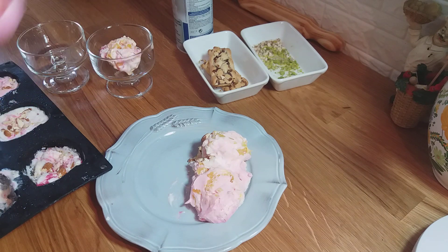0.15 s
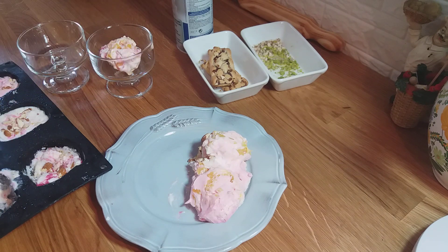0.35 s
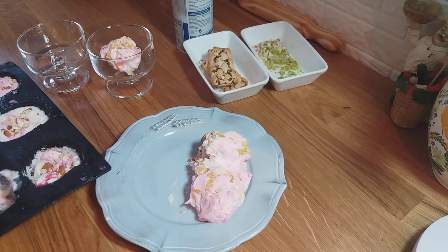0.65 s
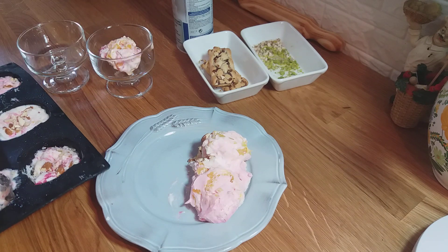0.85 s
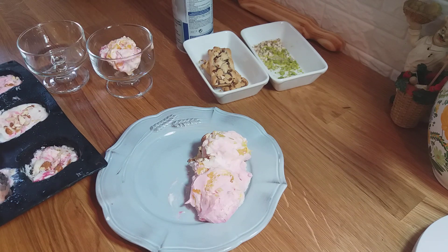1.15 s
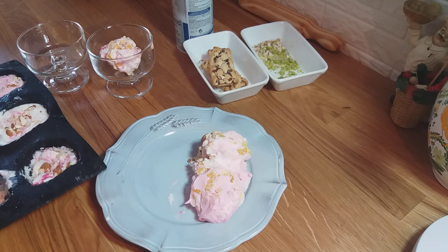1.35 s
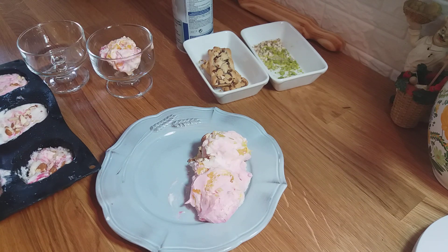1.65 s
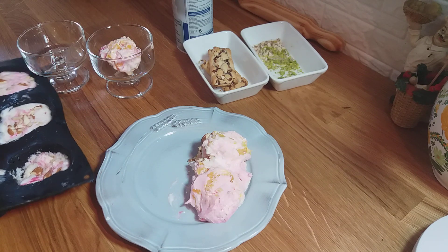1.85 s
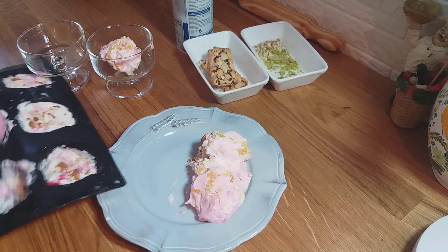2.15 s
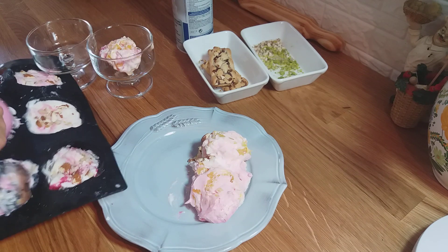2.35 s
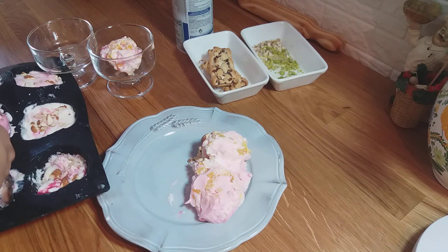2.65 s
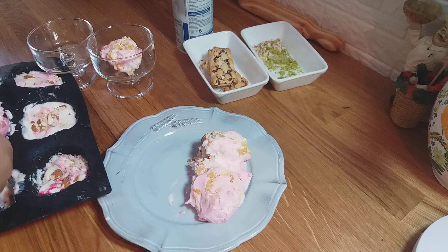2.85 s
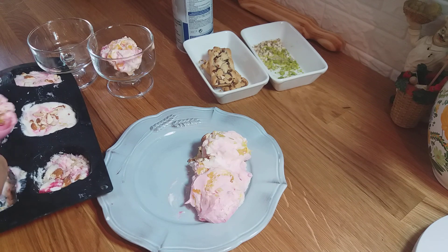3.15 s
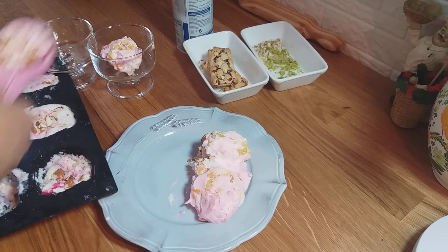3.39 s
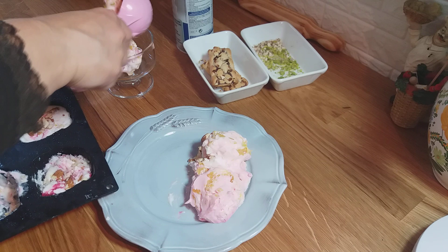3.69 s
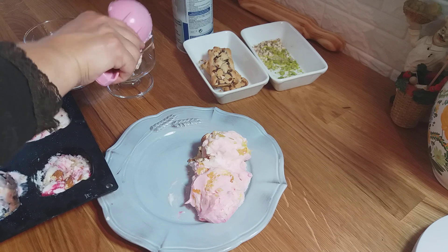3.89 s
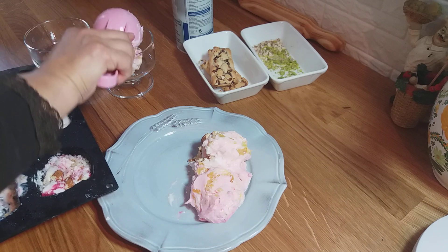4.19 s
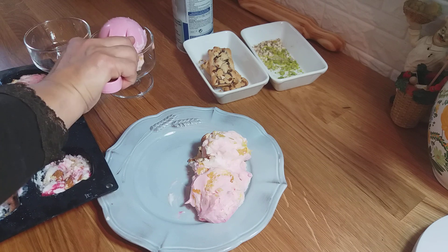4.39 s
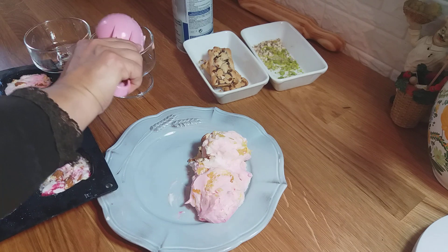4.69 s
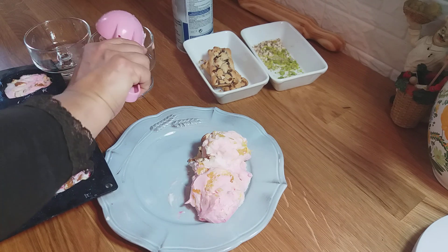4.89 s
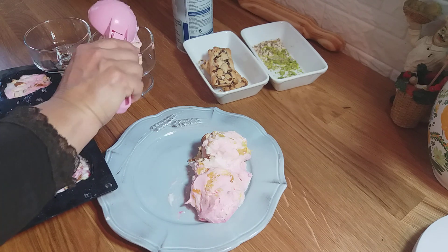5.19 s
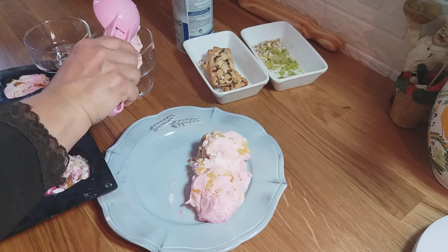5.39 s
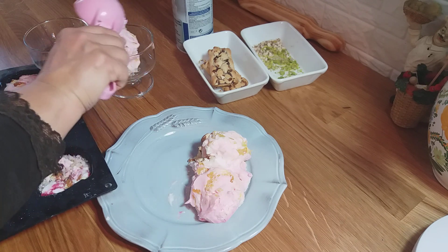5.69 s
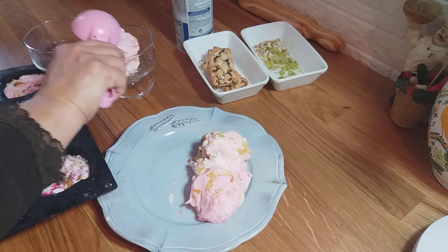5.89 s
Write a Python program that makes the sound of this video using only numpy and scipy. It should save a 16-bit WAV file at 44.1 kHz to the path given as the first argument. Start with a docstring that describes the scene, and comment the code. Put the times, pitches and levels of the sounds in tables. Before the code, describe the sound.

A faint fridge hum with a thin whine runs throughout, in a small kitchen with a short, hard echo. A scoop's steel spring ticks lightly, clearest at 0.4 seconds. From about 0.8 to 1 second its plastic shell snaps, creaks and crackles sharply. A tray gives a loud, clattering knock on the wooden counter at 1.4 seconds, then softer knocks near 1.7 and 2.2. It slides briefly and strikes glass cups at 2.4 seconds; they chatter and ring brightly for a moment over a wooden thud, the loudest sound. A dull knock follows at 2.8, then tiny plastic ticks around 3.1. After a lull, a very soft low rumble swells from 4.1 to 4.5 seconds. The scoop bumps gently into a cup at 4.6 and gives a quick cluster of sharp snaps at 4.8. A barely audible knock comes near 5.8 seconds.

```python
"""In a small, hard-walled kitchen, frozen dessert is served on a wooden counter while a fridge hums.
The steel spring of a plastic scoop ticks, and its lever sticks and slips, making the shell crackle.
A mould tray knocks on the wood and slides into glass cups, which chatter together and ring.
After a soft, low rumble, the loaded scoop bumps into a cup and snaps again."""
import sys
import numpy as np
from scipy import signal
from scipy.fft import rfft, irfft, next_fast_len
from scipy.io import wavfile
from scipy.ndimage import map_coordinates

SR = 44100
rng = np.random.default_rng(int(sys.argv[2]) if len(sys.argv) > 2 else 0)


def unload_audio(sound):
    """Save the sound as a 16-bit wav file, at the path given as the first command line argument."""
    columns = np.transpose(np.atleast_2d(sound))
    # keep every value between -1 and 1, then stretch to whole-number steps
    steps = np.round(np.clip(columns, -1, 1) * 32767)
    wavfile.write(sys.argv[1], SR, steps.astype(np.int16))


N = 266364
AGE = np.arange(SR // 2) / SR  # seconds since a blow
HZ = np.fft.rfftfreq(SR, 1 / SR)
OCTAVES = np.log2((HZ + 1) / 8000)  # octaves above 8000 Hz, for tilting the treble


def amp(db):
    """Turn decibels into a gain."""
    return 10 ** (np.asarray(db) / 20)


def unit(x):
    """Scale x to an average (rms) level of 1."""
    return x / np.sqrt(np.mean(x ** 2) + 1e-20)


def along(points, hz):
    """Read between (frequency, value) points on a pitch scale."""
    freqs, values = np.transpose(points)
    return np.interp(np.log(hz + 1), np.log(freqs), values)


def resonances(table, hz):
    """Gain of an object that favours certain pitches; small objects give off little bass."""
    power = sum(amp(db) ** 2 / (1 + ((hz - pitch) / width * 2) ** 2) ** 1.5
                * np.minimum(hz / pitch, 1) ** 2 for pitch, width, db in table)
    return np.sqrt(power)


def fade(t60):
    """Die away after a blow; t60 is the ring time, the seconds taken to fall 60 dB."""
    return amp(-60 * AGE / t60)


def wobble(rate):
    """A smooth random curve through `rate` points a second."""
    points = rng.standard_normal(int(N * rate / SR) + 4)
    return map_coordinates(points, [np.arange(N) * rate / SR])


def filtered(x, response):
    """Give each frequency in x its own gain."""
    size = next_fast_len(N + SR // 2)
    return irfft(rfft(x, size) * response(np.fft.rfftfreq(size, 1 / SR)), size)[:N]


def swell(rows):
    """A gain that follows (time [s], level [dB]) rows and dies away outside them."""
    times, db = np.transpose(rows)
    t = np.arange(N) / SR
    outside_s = np.abs(t - np.clip(t, times[0], times[-1]))
    return amp(np.interp(t, times, db) - 600 * outside_s)


def add(track, s, sound):
    """Mix a sound in, starting at s seconds."""
    part = track[round(s * SR):][:len(sound)]
    part += sound[:len(part)]


def blow(gain, t60, push_db):
    """One hit: a sharp push and a dying burst of noise, coloured by the object's gain curve."""
    force = rng.standard_normal(len(AGE)) * fade(t60)
    force[0] += amp(push_db) * np.linalg.norm(force)
    cepstrum = irfft(np.log(gain + 1e-6), SR)
    body = np.exp(rfft(2 * cepstrum[:SR // 2], SR))  # rings only after the hit, never before
    sound = irfft(rfft(force, SR) * body, SR)[:len(AGE)]
    return sound / np.linalg.norm(sound) * np.sqrt(SR / 100)  # the energy of 10 ms at level 1


def ringing(modes, scatter_db):
    """The dying tones of a struck object, each with a new strength and sign at every hit."""
    return sum(amp(db + rng.normal(0, scatter_db)) * rng.choice([-1, 1])
               * fade(t60) * np.sin(2 * np.pi * hz * AGE) for hz, db, t60 in modes)


def in_kitchen(x, wet_db):
    """Add the echo of the hard walls at level wet_db; its treble dies first."""
    # how long the room rings: (frequency [Hz], ring time [s])
    echo_times = [(100, 0.52), (500, 0.37), (1500, 0.4), (4000, 0.4), (8000, 0.34), (12000, 0.25),
                  (16000, 0.25)]
    hz, t, noise = signal.stft(rng.standard_normal(len(AGE)), SR, nperseg=256)
    decay = amp(-60 * t / along(echo_times, hz)[:, None])
    tail = signal.istft(noise * decay, SR, nperseg=256)[1][:len(AGE)]
    tail *= 1 - fade(0.022)  # echoes build up over the first milliseconds
    room = amp(wet_db) * tail / np.linalg.norm(tail)
    room[0] += 1  # the direct sound
    return signal.fftconvolve(x, room)[:len(x)]


def tones(table, waver_db, drift):
    """Lasting tones that waver a little in level and pitch."""
    t = np.arange(N) / SR
    return sum(np.sqrt(2) * amp(db + waver_db * wobble(8.7))
               * np.sin(2 * np.pi * (hz * t + rng.random()) + drift * wobble(7.5)) for hz, db in table)


def refrigerator():
    """The fridge motor hums unsteadily, with a thin whine, over soft room noise."""
    # colour of the room noise: (frequency [Hz], relative level [dB])
    air_colour = [(25, -13), (42, -9.5), (60, -0.5), (85, 0), (200, -0.5), (350, 5), (600, -4.5),
                  (900, -7.5), (1500, -12.5), (2200, -11.5), (4000, -18), (6800, -27.5), (8500, -21),
                  (11000, -23.5), (16000, -20.5)]
    # low tones of the motor: (pitch [Hz], level [dB])
    hum_tones = [(96.9, -71.5), (145.3, -71.5), (193, -65.5), (241, -64), (293.8, -62), (357.3, -68.5),
                 (393.0, -75.5), (441.4, -81), (500.6, -74.5), (576.0, -76.5), (672.9, -77.5)]
    # high tones of the whine: (pitch [Hz], relative level [dB])
    whine_tones = [(1879, -87), (2024, -83), (2159, -82), (2455, -86.5), (3515, -83), (5249, -96.5)]
    air = unit(filtered(rng.standard_normal(N), lambda hz: amp(along(air_colour, hz))))
    hum = tones(hum_tones, waver_db=1, drift=.35)
    whine = amp(1) * tones(whine_tones, waver_db=.5, drift=.5)
    return hum + whine + amp(-62 + .5 * wobble(4.98)) * air


def spring():
    """The scoop's steel spring ticks lightly as the grip shifts."""
    # ticks: (time [s], level [dB], treble tilt [dB per octave])
    ticks = [(0.1444, -59, -4.5), (.252, -63, -5), (.3915, -40.5, 0.5)]
    # resonances of the spring: (pitch [Hz], width [Hz], level [dB])
    steel_peaks = [(2120, 660, -10), (3480, 800, -1.5), (5000, 700, -5.5), (8960, 790, 3), (10100, 900, -5),
                   (11900, 900, -6), (13500, 900, -9), (15200, 1200, -12)]
    out, steel = np.zeros(N), resonances(steel_peaks, HZ)
    for s, db, tilt_db in ticks:
        tick = blow(steel * amp(tilt_db * OCTAVES), t60=0.019, push_db=-2)
        add(out, s, amp(db) * in_kitchen(tick, wet_db=-7.5))
    return out


def scoop():
    """Each slip of the lever snaps the plastic shell; lighter snaps are shorter and thinner."""
    # single snaps: (time [s], level [dB], place [0 lever to 1 bowl])
    snaps = [(0.7705, -34, .45), (.792, -44, .15), (0.8205, -30, .35), (0.8412, -31, .2),
             (0.865, -32.5, .15), (0.9332, -26, 0), (.938, -34.5, 0), (0.9663, -28, 0), (0.9766, -26.5, .2),
             (2.1155, -50.5, .35), (2.4015, -54.5, .5), (3.0585, -58, .3), (3.087, -60.5, .5),
             (4.812, -38, 1), (4.8202, -29.5, .9), (4.8366, -28.5, .4)]
    # shell resonances: (pitch [Hz], width [Hz], level hit at the lever [dB], level hit at the bowl [dB])
    shell_peaks = [(1040, 288, -14.5, -12.5), (1867, 480, -7, -4), (2260, 350, -5, -6.5),
                   (3550, 490, -3, -8.5), (4300, 500, -10.5, -0.5), (4960, 540, -2.5, -4.5),
                   (6006, 580, 1, -6), (8330, 600, 2.5, 3.5), (9110, 880, -2.5, 3.5),
                   (10130, 1000, 0.5, -9.5), (11850, 1200, -8.5, 2.5), (13600, 2300, -5.5, -4),
                   (15300, 2100, -6, -4)]
    firm_db, firm_ring_s = -30.5, 0.03  # a firm snap
    out, peaks = np.zeros(N), np.array(shell_peaks)
    lever, bowl = resonances(peaks[:, :3], HZ), resonances(peaks[:, [0, 1, 3]], HZ)
    crack = amp(-14) * HZ / (HZ + 1200)  # broad, with no pitch
    for s, db, place in snaps + slips():
        t60 = firm_ring_s * 2 ** ((db - firm_db) / 20)  # 20 dB stronger rings twice as long
        tilt_db = 0.056 * (firm_db - db)
        shell = np.hypot(lever ** (1 - place) * bowl ** place, crack)
        snap = blow(shell * amp(tilt_db * OCTAVES), t60, push_db=-9.5)
        add(out, s, amp(db) * in_kitchen(snap, wet_db=-5.5))
    return out


def slips():
    """List the snaps that make up the creaks: the lever sticks and lets go at a nearly even rate."""
    # creaks: (start [s], length [s], rate [slips per s], level [dB], place [0 lever to 1 bowl])
    creaks = [(0.8758, .0315, 175, -33, .05), (1.53, .08, 32, -61.5, .8), (2.128, .03, 88, -56, .4)]
    scatter_s, scatter_db = 0.00033, 1
    return [(start + age + rng.normal(0, scatter_s), db + rng.normal(0, scatter_db), place)
            for start, length, rate, db, place in creaks for age in np.arange(0, length, 1 / rate)]


def tray():
    """The tray rocks and knocks on the counter; some knocks are sharp, others dull."""
    # knocks: (time [s], level [dB], treble fades above [Hz], thump compared with the knock [dB])
    knocks = [(1.122, -55.5, 4000, -23), (1.3555, -30.5, 12300, -24), (1.3674, -26, 7000, -23.5),
              (1.3767, -33, 3000, -16), (1.648, -55, 12100, 5.5), (1.673, -45, 3900, -36),
              (2.2015, -39, 2497, -6.5), (2.766, -46, 4040, -8.5), (5.818, -64.5, 2500, -17)]
    # colour of the tray: (frequency [Hz], relative level [dB])
    tray_colour = [(100, -25), (400, -24.5), (680, -14.5), (900, 4), (1150, 1), (1650, 2.5), (2100, -9.5),
                   (3800, -12), (6000, -18.5), (9000, -13.5), (12000, -16), (16000, -29)]
    out, body = np.zeros(N), amp(along(tray_colour, HZ))
    for s, db, treble_hz, thump_db in knocks:
        knock = blow(body / np.hypot(1, HZ / treble_hz), t60=0.041, push_db=0)
        thump = blow(counter(), t60=.025, push_db=3)
        add(out, s, amp(db) * in_kitchen(knock + amp(thump_db) * thump, wet_db=-6))
    return out


def counter():
    """Gain curve of the wooden counter, which answers a hit with a dull thud."""
    # colour of the wood: (frequency [Hz], relative level [dB])
    wood_colour = [(25, -46), (45, -33.5), (80, -22.5), (130, -7), (215, -3.5), (330, -5.5), (430, -5),
                   (500, 0.5), (620, -5), (740, 1), (860, -7), (1050, -7.5), (1450, -17.5), (3000, -34.5),
                   (10000, -69.5)]
    return amp(along(wood_colour, HZ))


def slide():
    """The tray judders over the wood in uneven slips."""
    # loudness of the slide: (time [s], relative level [dB])
    loudness = [(2.26, -60), (2.28, -60), (2.352, -42), (2.39, -49.5), (2.41, -41)]
    # resonances of the judder: (pitch [Hz], width [Hz], level [dB])
    judder_peaks = [(400, 79, 0.5), (470, 60, -4.5), (740, 167, -12), (1500, 600, -22.5),
                    (2487, 395, -26.5), (8606, 250, -28)]
    friction = rng.standard_normal(N) * amp(3 * wobble(90))
    rub = unit(filtered(friction, lambda hz: resonances(judder_peaks, hz)))
    return in_kitchen(amp(1) * swell(loudness) * rub, wet_db=-4.5)


def cups():
    """The cups clink together and thud on the counter; glass tones close in pitch pulse as they ring."""
    # short-lived resonances of the glass: (pitch [Hz], width [Hz], level [dB])
    glass_peaks = [(1990, 270, 1), (2394, 240, -3), (3053, 150, -4.5), (3600, 500, -8.5),
                   (4155, 400, -10.5), (4900, 260, -5.5), (5400, 350, -5), (5940, 200.6, -4.5),
                   (7450, 380, 0), (8000, 400, -0.5), (9840, 350, 1.5), (10230, 590, 0.5),
                   (10960, 300, -8.5), (12500, 230, -3.5), (13700, 470, -0.5)]
    # lasting tones of the cups: (pitch [Hz], relative level [dB], ring time [s])
    glass_tones = [(4904, -6.5, 0.35), (5320, -11.5, 0.3), (5350, -14, 0.36), (5523, -10.5, 0.36),
                   (7130, -5, 0.35), (7333, -5, 0.3), (7550, -7.5, 0.32), (7849, -12, 0.3),
                   (8000, -7.5, 0.28), (8549, -5, 0.1905), (9006, -23.5, 0.3), (9799, -5.5, 0.327),
                   (10100, -8.5, 0.24), (10360, -2, 0.19), (10100, -16, 0.42), (10900, -18, 0.39),
                   (12160, -20, 0.27), (12560, -20.5, 0.35), (13360, -15.5, 0.26), (13622, -7.5, 0.2)]
    # tones of the wooden counter: (pitch [Hz], relative level [dB], ring time [s])
    wood_tones = [(212, -6, .24), (488.3, 3, .27), (500, -3, .26), (555, -4, 0.22), (712, -3, .27),
                  (752, 0, .23), (1030, -8, .2)]
    out, glass = np.zeros(N), resonances(glass_peaks, HZ)
    for s, glass_db, thud_db in chatter():
        detuned = np.array(glass_tones)
        detuned[:, 0] *= 1 + rng.normal(0, 0.0018, len(detuned))  # each touch detunes the rims a little
        clink = in_kitchen(blow(glass, t60=.05, push_db=-11), wet_db=-6)
        clink += amp(-11.5) * ringing(detuned, scatter_db=1.5)
        thud = in_kitchen(blow(counter(), t60=0.092, push_db=-5), wet_db=-6)
        thud += amp(-6.5) * ringing(wood_tones, scatter_db=2)
        add(out, s, amp(glass_db) * clink + amp(thud_db) * thud)
    return out


def chatter():
    """List each touch of the clashing cups: the gaps widen while the push peaks and eases."""
    # clashes: (start [s], length [s], glass level [dB], thud level [dB])
    clashes = [(2.4189, .029, -23, -30), (2.4621, .0065, -31.5, -38.5)]
    first_gap_s, slowing = .0043, 1.095
    peak_s, rise_db, fall_db_per_s = 0.0072, 4, 350
    gaps = first_gap_s * slowing ** np.arange(8)
    ages = np.cumsum(gaps) - gaps
    press_db = np.minimum(rise_db * (ages / peak_s - 1), fall_db_per_s * (peak_s - ages))
    return [(s + age, glass_db + db, thud_db + db)
            for s, length, glass_db, thud_db in clashes
            for age, db in zip(ages, press_db) if age < length]


def rumble():
    """A soft, low rumble near 60 Hz swells while the scoop hovers over the cup."""
    level = swell([(4.12, -69), (4.49, -65)])
    return level * unit(filtered(rng.standard_normal(N), lambda hz: resonances([(60, 8, 0)], hz)))


def bump():
    """The loaded scoop lands softly in a cup: dull thuds, and a small ring at first touch."""
    # the scoop lands and settles: (time [s], level [dB])
    landings = [(4.5763, -47), (4.586, -50)]
    # tones of one softly struck cup: (pitch [Hz], level [dB], ring time [s])
    cup_tones = [(1900, -52, 0.045), (2270, -43.5, 0.013), (3200, -55, 0.04), (4200, -51, 0.018),
                 (4950, -63, 0.18)]
    out = np.zeros(N)
    muffled_wood = counter() / np.hypot(1, (HZ / 450) ** 2)
    for s, db in landings:
        add(out, s, amp(db) * blow(muffled_wood, t60=0.036, push_db=-4.5))
    add(out, landings[0][0], ringing(cup_tones, scatter_db=0))
    return in_kitchen(out, wet_db=-7.5)


def scene():
    """All the kitchen's sounds, heard from one point."""
    return (refrigerator() + spring() + scoop() + tray() + slide() + cups() + rumble() + bump())[None]


def record(dry):
    """Cut away the deepest bass and the highest treble."""
    bottom_hz, top_hz = 42, 15850
    low_cut = lambda hz: 1 / np.hypot(1, (bottom_hz / (hz + 1)) ** 3)
    high_cut = lambda hz: 1 / np.hypot(1, (hz / top_hz) ** 90)
    return filtered(dry[0], lambda hz: low_cut(hz) * high_cut(hz))[None]


dry = scene()
out = record(dry)
unload_audio(out)
```